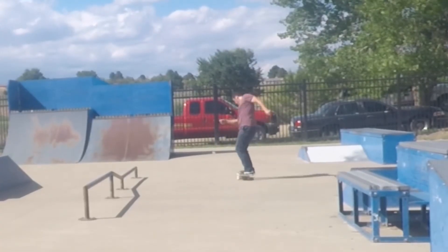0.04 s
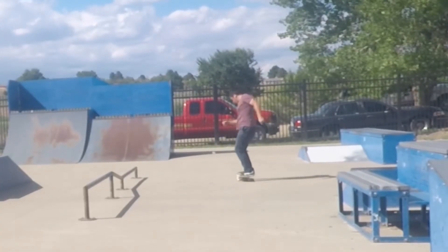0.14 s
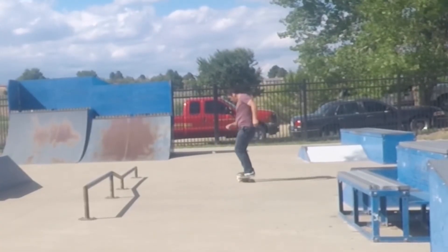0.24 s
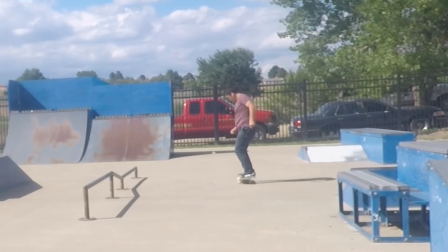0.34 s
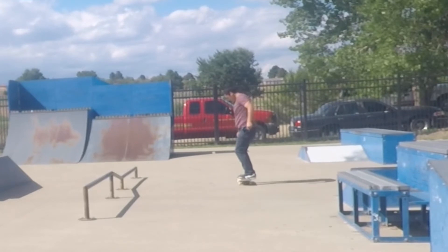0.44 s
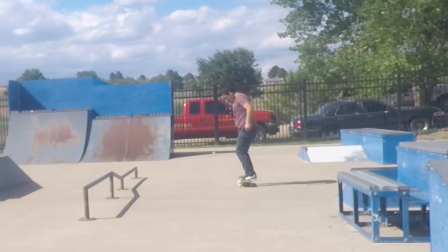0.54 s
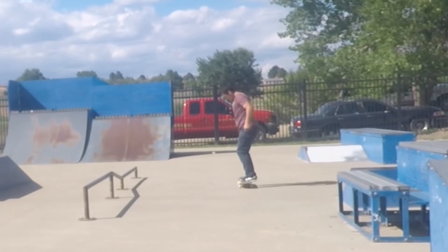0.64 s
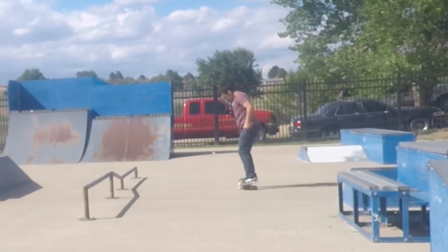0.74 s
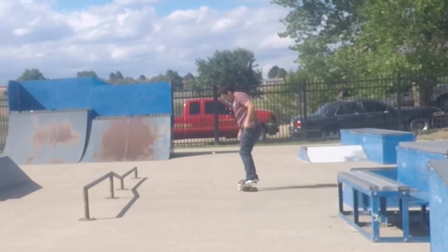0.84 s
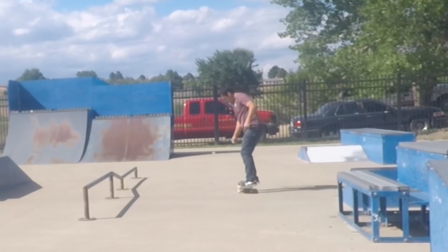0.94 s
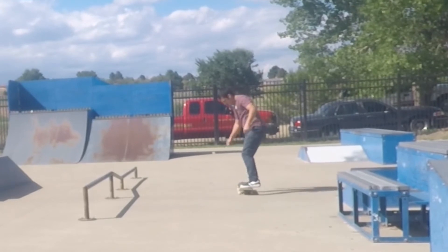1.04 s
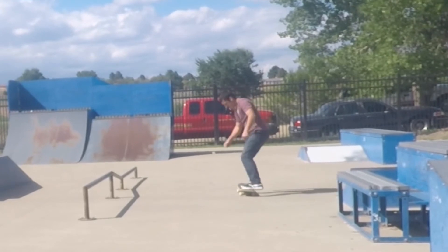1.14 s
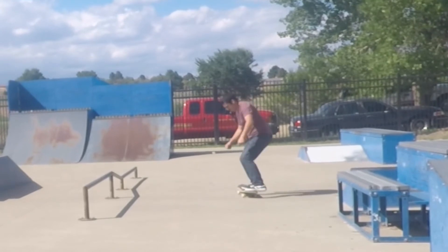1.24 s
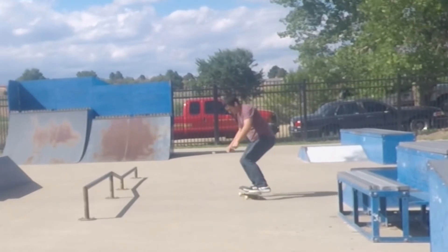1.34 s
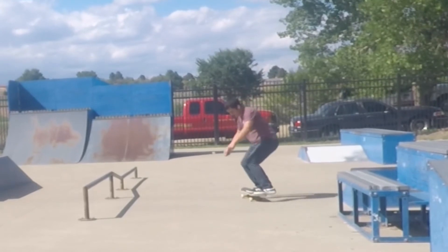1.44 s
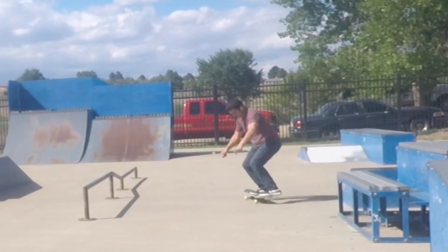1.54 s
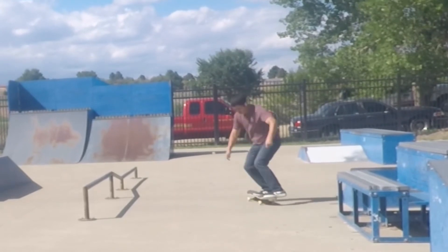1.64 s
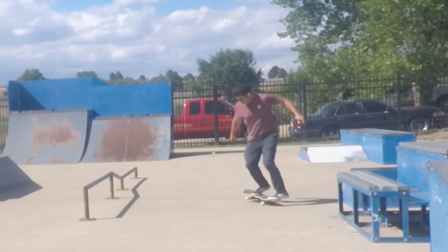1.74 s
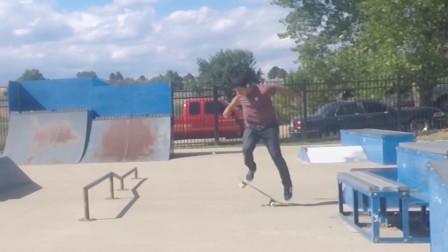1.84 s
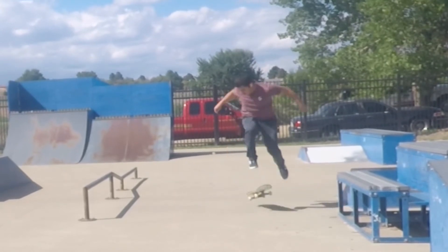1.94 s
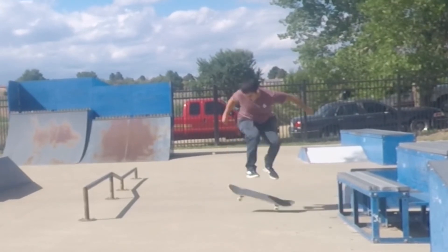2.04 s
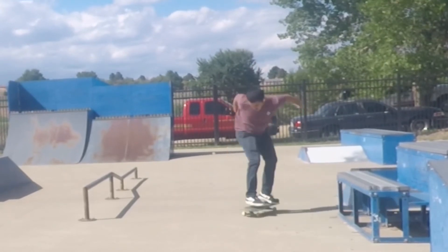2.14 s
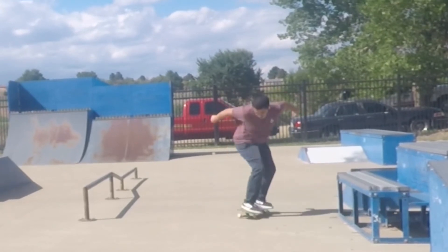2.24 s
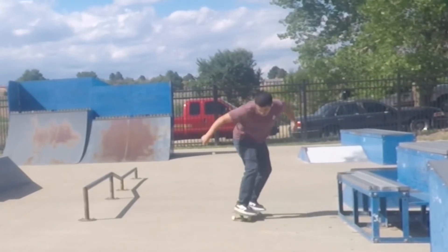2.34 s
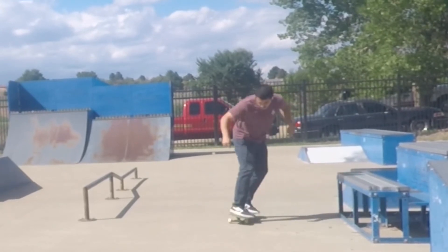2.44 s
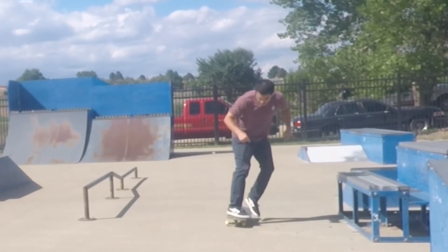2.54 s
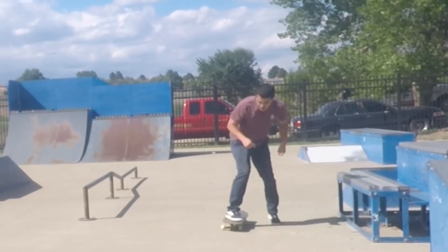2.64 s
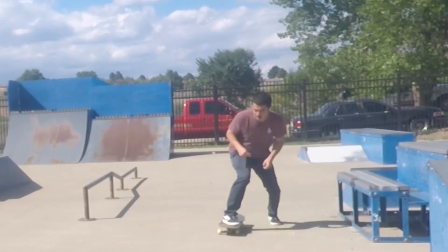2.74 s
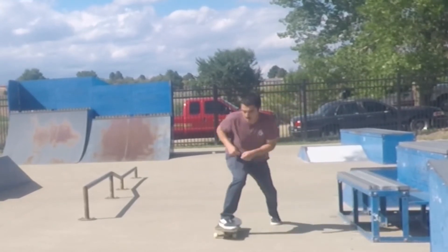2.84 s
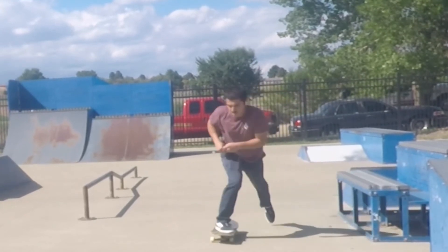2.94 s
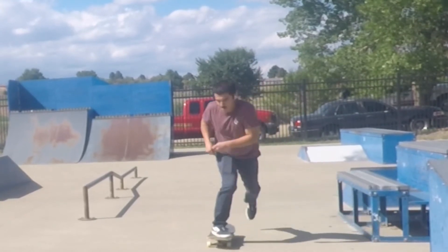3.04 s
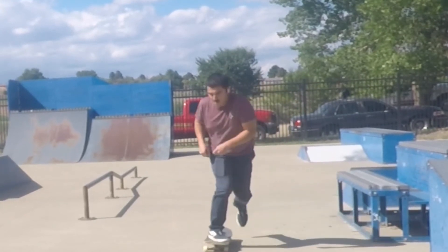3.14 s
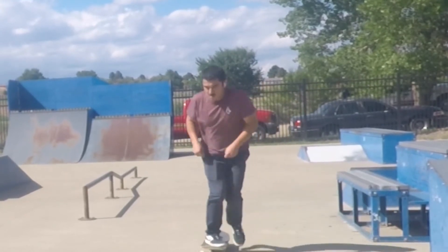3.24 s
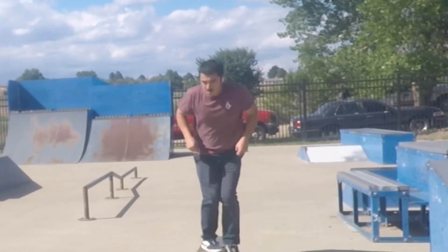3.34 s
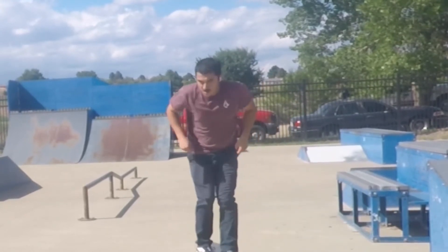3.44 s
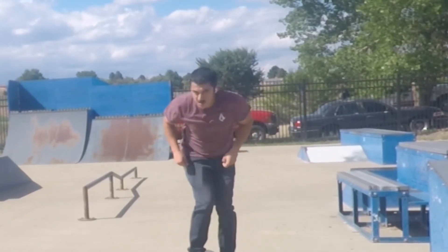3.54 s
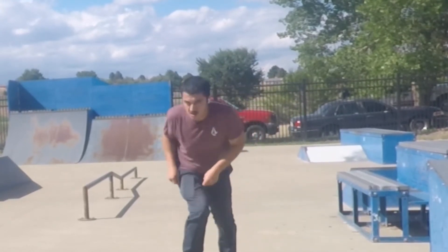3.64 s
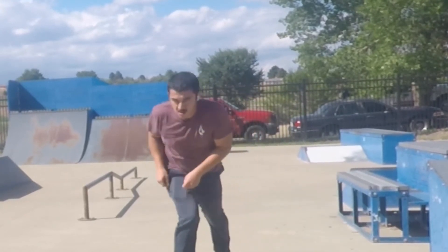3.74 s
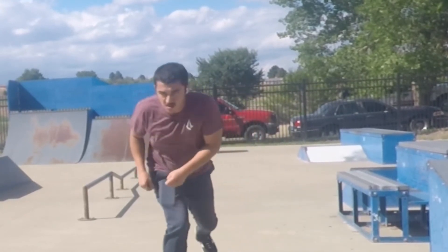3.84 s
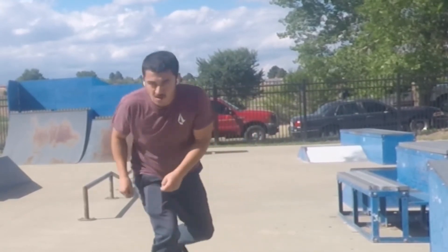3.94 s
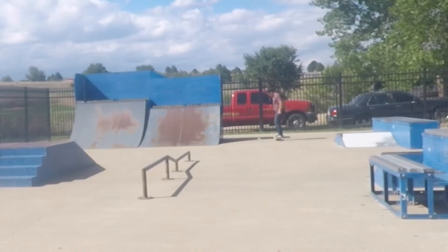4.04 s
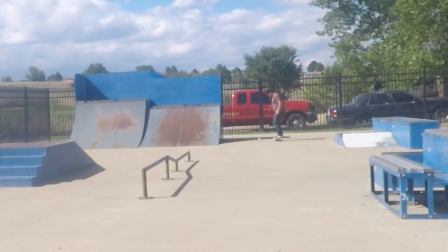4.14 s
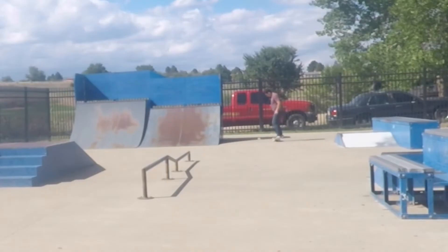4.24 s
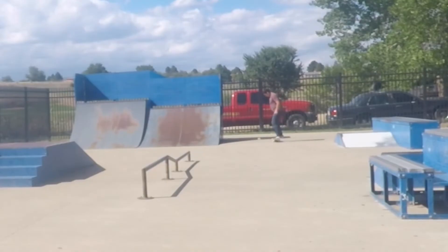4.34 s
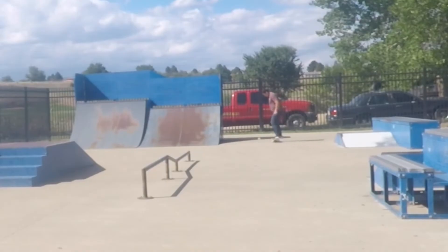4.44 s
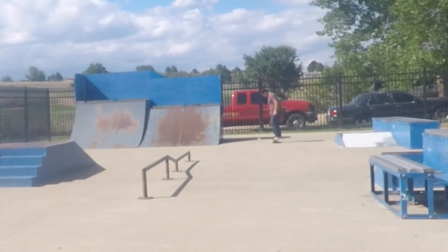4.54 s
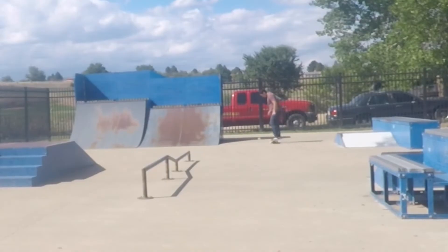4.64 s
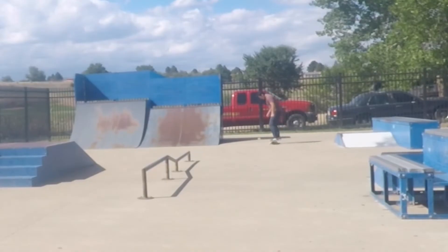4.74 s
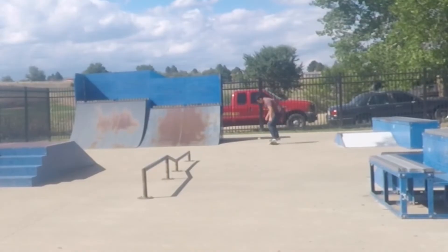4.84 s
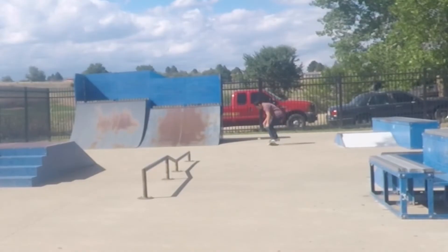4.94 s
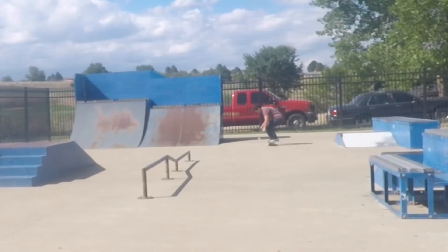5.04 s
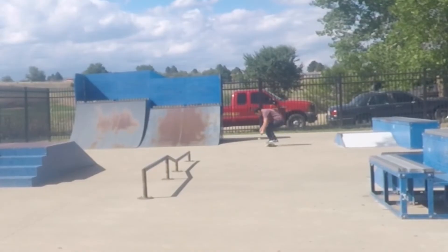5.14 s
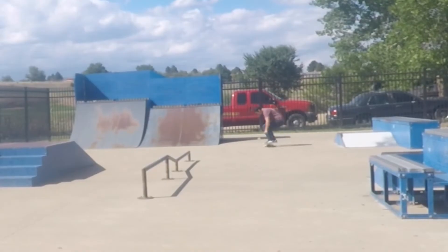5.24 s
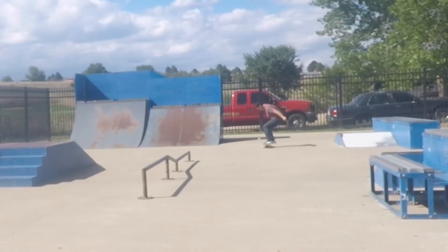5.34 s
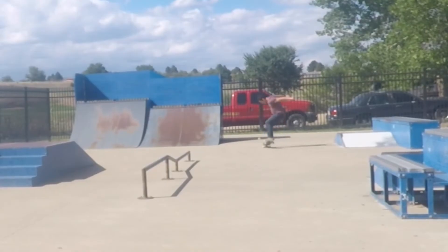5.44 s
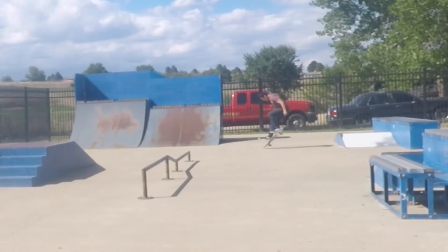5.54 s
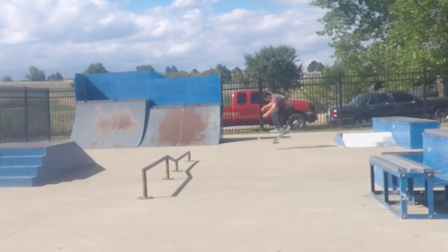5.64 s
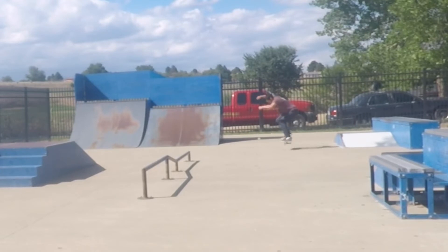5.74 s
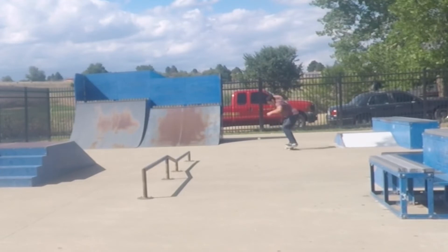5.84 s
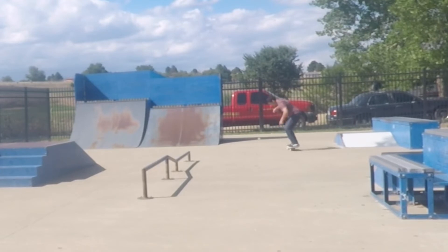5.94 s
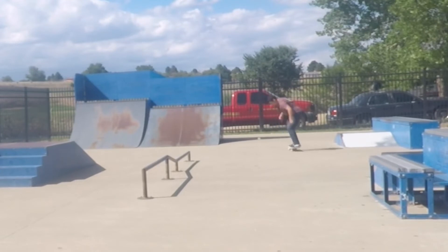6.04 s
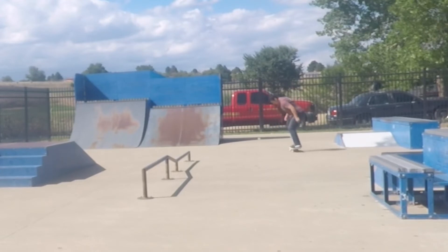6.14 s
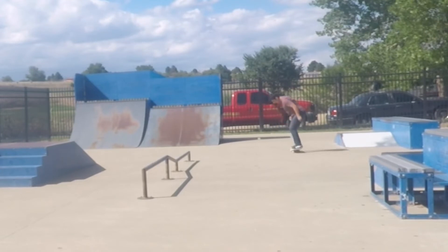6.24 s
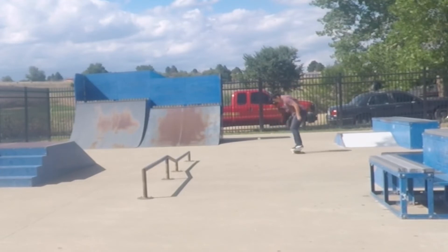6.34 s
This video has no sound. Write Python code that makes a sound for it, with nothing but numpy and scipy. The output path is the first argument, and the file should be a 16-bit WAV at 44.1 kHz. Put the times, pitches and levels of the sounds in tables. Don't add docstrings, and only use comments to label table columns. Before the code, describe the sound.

Hard skateboard wheels rumble and hum across concrete in gusty wind, the board cracks loudly, rolls up close, then after a cut cracks again farther off.

```python
import sys
import numpy as np
from scipy import signal
from scipy.fft import rfft, irfft, next_fast_len
from scipy.io import wavfile
from scipy.ndimage import uniform_filter1d, minimum_filter1d, map_coordinates

SR = 44100
rng = np.random.default_rng(int(sys.argv[2]) if len(sys.argv) > 2 else 0)


def to_linear_factor(level_db):
    exponent = np.asarray(level_db, float) / 20
    return 10 ** exponent


def file_out(sig):
    cols = np.atleast_2d(sig).T
    lim = np.clip(cols, -1, 1)
    pcm = np.round(lim * 32767).astype(np.int16)
    wavfile.write(sys.argv[1], SR, pcm)


N = 282240
CUT_S = 4.02
REACH = SR // 4

# time in seconds, closeness in dB, looseness of the axles in dB.
ROLL = [(0, -27, -30.5), (.1, -46.5, -3.5), (.4, -51.5, -1), (1.1, -41.5, -9), (2.0, -42.5, -16.5),
        (2.12, -25.5, -32), (2.2, -37.5, -3), (2.4, -35.5, -17.5), (3.26, -33, -11.5), (3.46, -27.5, -7.5),
        (3.99, -27, -9), (4.04, -38.5, -18.5), (5.2, -38, -19), (5.4, -35.5, -16), (5.65, -43, -13.5),
        (5.9, -33.5, -5.5), (5.96, -37.5, -19), (6.4, -40, -10)]
# frequency in Hz, width in Hz, level in dB.
DECK = [(444, 64, 3), (566, 60.4, 4.5), (706, 73, -3.5), (955, 22, 2.5), (1187, 20, -16), (1303, 51, -11),
        (1566, 56, -14), (1870, 72, -16), (2458, 37, -22.5)]


def unit(x):
    return x / np.sqrt(np.mean(x ** 2) + 1e-20)


def along(points, hz):
    f, v = np.transpose(points)
    return np.interp(np.log(hz + 1), np.log(f + 1), v)


def curves(table):
    s, *cols = np.transpose(table)
    return [np.interp(np.arange(N) / SR, s, c) for c in cols]


def wobble(rate, size=N):
    knots = rng.standard_normal(int(size * rate / SR) + 4)
    return map_coordinates(knots, [np.arange(size) * rate / SR])


def filtered(x, response):
    m = next_fast_len(x.shape[-1] + SR // 4)
    return irfft(rfft(x, m) * response(np.fft.rfftfreq(m, 1 / SR)), m)[..., :x.shape[-1]]


def modes(f, rows):
    total = 0
    for k, (c, w, db) in enumerate(rows):
        total = total + (-1) ** k * to_linear_factor(db) * 1j * f * w / (c * c - f * f + 1j * f * w)
    return total


def rush(spectrum, grain_db, deck_db=-99, deck=DECK):
    grain = np.array([wobble(180), wobble(180)])
    grains = rng.standard_normal((2, N)) * to_linear_factor(grain_db * grain)
    return unit(filtered(grains, lambda hz: to_linear_factor(along(spectrum, hz)) + to_linear_factor(deck_db) * modes(hz, deck)))


def deck_noise(spectrum, grain_db, near_db, far_db):
    # frequency in Hz, width in Hz, level in dB.
    far_deck = [(480, 50, 5), (724, 29, 8.5), (944, 40, -2.5), (1200, 40, -7.5), (1583, 76, -15.5),
                (1880, 110, -38)]
    close = rush(spectrum, grain_db, near_db)
    far = rush(spectrum, grain_db, far_db, far_deck)
    return np.where(np.arange(N) < CUT_S * SR, close, far)


def swell(length):
    return np.exp(-(np.arange(-REACH, REACH) / SR / (0.4 * length)) ** 2)


def placed(events):
    out = np.zeros((2, N + 2 * REACH))
    for s, sound in events:
        start = round(s * SR)
        out[:, start:start + 2 * REACH] += sound
    return out[:, REACH:N + REACH]


def wind():
    # time in seconds, buffet level in dB.
    buffets = [(0, -11.5), (.7, -19.5), (1.1, -15), (1.84, -21), (2.0, -31), (2.04, -15.5), (2.48, -24),
               (2.58, -34), (3.4, -28.5), (3.75, -34), (3.97, -19.5), (4.04, -45.5), (4.5, -47), (4.9, -38),
               (5.5, -34), (6.4, -33.5)]
    # centre in seconds, length in seconds, change in dB.
    blasts = [(0.088, 0.29, -0.5), (0.289, 0.08, -6), (0.384, 0.051, 0), (1.119, 0.033, 7),
              (1.383, 0.039, 8), (1.54, 0.12, 4), (1.716, 0.07, 4.5), (2.184, 0.17, -5.5), (3.17, 0.15, -6),
              (4.992, 0.041, 11.5), (5.117, 0.071, 10.5), (5.291, 0.095, 13), (5.374, 0.088, 10),
              (5.76, .12, 0)]
    # frequency in Hz, level in dB per Hz.
    gusts = [(6, -34), (15, 1.5), (25, -6), (45, 0.5), (80, -7.5), (140, -13), (250, -26.5), (500, -41),
             (900, -83.5)]
    t = np.arange(N) / SR
    buffet_db = curves(buffets)[0]
    for s, length, db in blasts:
        buffet_db = buffet_db + db * np.exp(-((t - s) / (.5 * length)) ** 2)
    lumps_db = 2.35 * wobble(9.8) + 1.1 * wobble(14)
    return to_linear_factor(buffet_db + 4) * unit(rush(gusts, grain_db=-2) * to_linear_factor(lumps_db))


def puffs():
    # centre in seconds, length in seconds, top frequency in Hz, left and right levels in dB.
    strikes = [(0.137, 0.027, 400, -16, -9.5), (0.182, 0.011, 260, -27, -19), (1.003, 0.017, 600, -42, -43),
               (1.218, 0.095, 247, -20.5, -15.5), (1.389, 0.049, 397, -28.5, -21.5),
               (1.508, 0.039, 304, -33, -20.5), (1.573, 0.021, 870, -21.5, -26.5),
               (1.589, 0.035, 640, -22.5, -34), (1.616, 0.02, 500, -27, -37), (1.711, 0.065, 302, -40, -39),
               (4.385, 0.03, 526, -45, -34)]

    def eddy(top_hz):
        noise = rng.standard_normal((2, 2 * REACH))
        return unit(filtered(noise, lambda f: f / (f + 90) / (1 + (f / top_hz) ** 6.8)))

    return placed((s, to_linear_factor([[left_db], [right_db]]) * swell(length) * eddy(top_hz))
                  for s, length, top_hz, left_db, right_db in strikes)


def ramps(x):
    # frequency in Hz, 60 dB decay time in seconds.
    decay = [(200, 0.68), (1500, 1), (8000, 0.25)]
    hz, t, z = signal.stft(rng.standard_normal((2, SR // 2)), SR, nperseg=256)
    fading = to_linear_factor(-60 * t / along(decay, hz)[:, None])
    tail = signal.istft(z * fading, SR, nperseg=256)[1]
    late = np.pad(x, (500, 0))[None]
    return signal.fftconvolve(late, tail / np.linalg.norm(tail[0]), axes=1)[:, :N]


def drone():
    # time in seconds, ground drone level in dB.
    ground = [(0, -32.5), (1.9, -27.5), (2.3, -23), (2.7, -29), (3.98, -20.5), (4.05, -35), (4.7, -51),
              (5.15, -30), (5.75, -29.5), (5.92, -32.5), (6.3, -23)]
    # time in seconds, share of deck sound swung to the left from 0 to 1.
    swing = [(0, 0.39), (2.0, 0.19), (2.2, 1), (3.2, 0.34), (4.0, 0.82), (4.03, 0.11), (5.7, 0.07),
             (5.85, 0.6), (6.4, 0.25)]
    (rumble_db, _), (drone_db,), (near,) = curves(ROLL), curves(ground), curves(swing)
    noise = rng.standard_normal((3, N))
    low = unit(filtered(noise[:2], lambda hz: modes(hz, [(101.4, 34.8, 0)]) ** 2))
    left = (1.03 + 1.0 * near) * (0.75 * low[0] + 0.42 * low[1])
    right = (1 - 0.67 * near) * low[0]
    low = to_linear_factor(drone_db + 1.64 * wobble(13)) * np.array([left, right])
    ring = unit(filtered(noise[2], lambda hz: modes(hz, [(381.4, 18.7, -5.0), (549.5, 31.4, -9.5)])))
    return low + to_linear_factor(rumble_db + 8.5) * near * ring * [[1], [-.3]]


def wheels():
    # frequency in Hz, level in dB.
    rumble_shape = [(90, -37.5), (150, 11), (200, 5.5), (300, -2), (500, -19), (800, -13), (1300, -33.5),
                    (2500, -70.5)]
    rattle_shape = [(350, -46.5), (600, 6), (800, -12), (1200, -2), (1550, -10), (2100, -12), (2800, -41.5),
                    (4500, -54)]
    grit_shape = [(1200, -30.5), (2200, 3.5), (3000, -2.5), (4500, -0.5), (7000, -4), (9000, -19),
                  (11000, -29.5), (13500, -49), (16000, -90)]
    close_db, loose_db = curves(ROLL)
    grit_db = -20 + 0.8 * close_db + 0.41 * loose_db
    shake = wobble(7.7)
    rumble = deck_noise(rumble_shape, grain_db=1.0, near_db=-10.5, far_db=-10.0)
    rumble = rumble * to_linear_factor(close_db + 6.0 + 0.33 * shake + 1.1 * wobble(30))
    rattle = deck_noise(rattle_shape, grain_db=1.5, near_db=5.0, far_db=1.5)
    rattle = rattle * to_linear_factor(close_db + loose_db + 8.5 + 0.32 * shake + 2.54 * wobble(45))
    grit = to_linear_factor(grit_db + 0.29 * shake + 0.89 * wobble(21.79)) * rush(grit_shape, grain_db=0.5)
    return rumble + rattle + grit


def hum():
    # time in seconds, frequency in Hz.
    spin = [(0, 185), (.8, 183), (1.2, 182), (1.9, 180), (2.15, 176.5), (3, 176.5), (3.6, 174.5), (4, 172)]
    # start in seconds, hold in seconds, level in dB.
    holds = [(0.119, 0.31, -29), (0.325, 0.15, -21.5), (0.721, 0.23, -21), (1.002, 0.11, -20),
             (1.489, 0.022, -27.5), (1.753, 0.019, -25), (2.202, 0.49, -23), (2.612, 0.31, -22),
             (3.158, 0.049, -28), (3.356, 0.076, -18), (3.606, 0.19, -12.5), (3.78, 0.15, -19),
             (3.942, 0.061, -21.5)]
    (hz,), t = curves(spin), np.arange(N) / SR
    rise_db_per_s, fall_db_per_s, idle_db = 302, 99, -48.5
    spells = []
    for s, hold, db in holds:
        rise_db = rise_db_per_s * np.maximum(s - t, 0)
        spells.append(db - rise_db - fall_db_per_s * np.maximum(t - s - hold, 0))
    level_db = np.where(t < CUT_S, np.maximum(np.max(spells, axis=0), idle_db), -99)
    phase = 2 * np.pi * np.cumsum(hz + .8 * wobble(25)) / SR
    octave_db = -41.5 + 0.18 * level_db + 5.5 + 5.7 * wobble(8.6)
    tremble_db = .9 * wobble(25)
    tone = to_linear_factor(level_db + 4.5 + tremble_db) * np.sin(phase) + to_linear_factor(octave_db) * np.sin(2 * phase)
    return tone * [[1], [.4]]


def scuffs():
    # centre in seconds, frequency in Hz, width in Hz, length in seconds, level in dB.
    slides = [(0.69, 1830, 100, 0.025, -57), (0.722, 1130, 110, 0.035, -44), (0.74, 1860, 150, 0.06, -54),
              (0.74, 1400, 120, 0.05, -54), (0.745, 2400, 250, 0.04, -59), (1.76, 1880, 200, 0.05, -56),
              (1.952, 1210, 616, 0.011, -46), (2.084, 1750, 1480, 0.042, -39),
              (2.099, 11800, 2500, .006, -47), (2.14, 6330, 1500, 0.012, -40),
              (2.155, 6000, 1800, 0.025, -43), (2.225, 2800, 1500, 0.02, -46),
              (2.596, 5300, 500, .018, -51), (2.592, 6450, 400, .015, -50), (2.592, 2450, 200, .03, -50),
              (2.537, 1850, 200, .015, -45), (2.583, 1850, 200, .025, -48), (2.058, 5500, 700, .006, -46),
              (2.08, 4500, 3500, .025, -44), (2.594, 3000, 1300, .02, -45), (2.601, 3240, 457, 0.017, -35),
              (3.42, 1500, 1200, 0.05, -40), (3.5, 1500, 1400, 0.06, -38), (3.975, 1200, 1500, 0.032, -33),
              (3.98, 4500, 4000, .04, -45), (5.375, 1700, 600, 0.04, -53), (5.46, 950, 700, 0.12, -43),
              (5.467, 493, 520, 0.071, -36), (5.48, 1900, 500, 0.05, -49), (5.475, 2250, 900, 0.07, -49),
              (5.43, 1900, 700, 0.1, -53), (5.44, 1150, 300, 0.06, -45), (5.53, 2500, 700, 0.05, -56),
              (5.721, 3750, 3000, 0.017, -47), (5.811, 6100, 900, 0.012, -45),
              (5.853, 930, 900, 0.035, -31), (5.857, 1520, 330, 0.026, -26),
              (5.96, 1480, 1510, 0.069, -46.5)]
    singing = [(.15, 1840, 150, 0.22, -67), (.5, 1873, 130, 0.25, -64.5), (.95, 1844, 150, 0.38, -64.5),
               (1.308, 1870, 200, 0.32, -66), (.2, 1166, 150, .3, -56), (.5, 1136, 130, 0.38, -50.5),
               (.85, 1120, 200, 0.37, -49), (1.2, 1180, 200, 0.35, -58), (0.857, 906, 200, 0.22, -47.5),
               (1.37, 1100, 700, 0.094, -44.5), (3.616, 1720, 600, 0.23, -50.5), (3.8, 1740, 600, .2, -48),
               (3.941, 1880, 500, 0.046, -38)]

    def rub(hz, width):
        noise = rng.standard_normal(2 * REACH)
        return unit(filtered(noise, lambda f: modes(f, [(hz, width, 0)]) ** 3))

    return placed((s, to_linear_factor(db) * swell(length) * rub(hz, width))
                  for s, hz, width, length, db in slides + singing)[0]


def squeaks():
    # centre in seconds, frequency in Hz, length in seconds, level in dB.
    bearings = [
        (0.744, 8400, 0.028, -57),
        (3.074, 8550, 0.045, -50),
        (3.502, 8400, 0.06, -50.5),
        (3.622, 8400, 0.062, -46.5),
        (3.87, 8430, 0.09, -44.5),
    ]
    span = 2 * REACH

    def whistle(hz, length, db):
        bent_hz = hz + 260 * swell(.5 * length) + 150 * wobble(1200, span)
        rough_db = 1.5 + 3.0 * wobble(160, span)
        return to_linear_factor(db + rough_db) * swell(length) * np.sin(2 * np.pi * np.cumsum(bent_hz) / SR)

    return placed((s, whistle(hz, length, db)) for s, hz, length, db in bearings)[0]


def rings():
    # start in seconds, frequency in Hz, level in dB, 60 dB decay time in seconds.
    metal = [(2.13, 960, -39, 1.0), (2.1, 1275, -41, .5), (2.6, 3300, -54, .3), (2.64, 3300, -58, .3),
             (5.771, 945, -15, .09), (5.785, 950, -30, .6), (5.78, 1575, -29, .1), (5.87, 1575, -35, .6),
             (5.9, 960, -36, 2.0), (2.098, 969, -20, .07), (2.097, 1857, -27, .06), (2.1, 700, -24, .05),
             (2.27, 385, -24, .9), (2.27, 560, -29, 1.6), (2.28, 320, -27, .3), (2.33, 960, -43, 1.2),
             (2.15, 500, -29, .5), (2.19, 700, -36, .8), (2.67, 385, -28, .5), (2.675, 3280, -59, .3),
             (2.705, 3220, -54, .3), (2.745, 3280, -59, .3), (1.825, 362, -29, 1.0), (.37, 368, -35, 4.0),
             (.65, 366, -32, .6), (.84, 364, -32, 1.0), (1.02, 364, -32, .25), (5.719, 700, -22, .07),
             (5.093, 720, -28, .07), (5.093, 1150, -37, .06), (5.095, 490, -25, .07),
             (5.093, 1000, -36, .05), (5.13, 720, -45, .9), (3.822, 1400, -33, .06),
             (3.978, 2450, -41, .06), (3.98, 1150, -30, .06)]
    out, t = np.zeros(N + SR), np.arange(SR // 2) / SR
    for s, hz, db, t60 in metal:
        loose = np.cumsum((6 + .006 * hz) * wobble(70, len(t))) / SR
        flutter_db = 3.5 * wobble(35, len(t))
        tone = np.sin(2 * np.pi * (hz * t + loose)) * np.cos(np.pi * t)
        out[round(s * SR):][:len(t)] += to_linear_factor(db - 60 * t / t60 + flutter_db) * tone
    return out[:N]


def hits():
    # start in seconds, crack, slap and thud levels in dB,
    # 60 dB decay time in seconds.
    blows = [(1.9632, -13, -13, 1, 0.038), (2.0695, -34.5, -23, -22, 0.074), (2.0958, -5, -14, -2.5, 0.029),
             (2.1045, -11, -8, -4.5, 0.044), (2.1185, -20.5, -19, 2, 0.024),
             (2.5787, -37, -43.5, -41.5, 0.14), (5.7175, -36, -29.5, -25, 0.04),
             (5.7250, -38, -32, -40.5, 0.062), (5.7592, -14.5, -17.5, -28, 0.008),
             (5.7645, -15, -21, -28.5, 0.015), (5.7678, -16, -28.5, -22.5, 0.012),
             (5.7790, -9, -13.5, -29.5, 0.028), (5.7705, -25, -10, -5.5, 0.077),
             (5.7854, -17, -13.5, 2, 0.032), (5.837, -36.5, -35.5, -27.5, 0.043),
             (5.8485, -39, -18, -22, 0.035), (5.8545, -35, -24, -21.5, 0.022),
             (5.860, -30, -32, -29, 0.012)]
    # start in seconds, crack and slap levels in dB.
    taps = [(0.9918, -47.5, -37.5), (1.2115, -55, -42.5), (1.996, -31.5, -34.5), (2.0564, -34, -26),
            (2.1387, -40, -38), (2.157, -46, -42.5), (2.2194, -38.5, -26), (2.2397, -37.5, -28.5),
            (2.4588, -41, -30.5), (2.509, -38, -39.5), (2.5331, -34.5, -26.5), (2.6395, -47, -32),
            (3.399, -45, -37), (3.413, -32, -28), (3.461, -30.5, -38), (3.482, -41, -28),
            (3.51, -37, -27.5), (3.546, -39, -28.5), (3.714, -46, -43.5), (3.829, -43, -41.5),
            (3.899, -53.5, -35), (3.9841, -50, -26.5), (5.045, -54, -51), (5.078, -54.5, -41),
            (5.0915, -41, -29.5), (5.353, -56, -43.5), (5.8065, -37.5, -38.5), (5.887, -35.5, -40),
            (5.9150, -37, -38), (5.945, -40.5, -36)]
    # time in seconds, thud in Hz, overtone in Hz, overtone's share.
    stiffness = [
        (1.96, 247, 434, 0.57),
        (2.1, 253, 480, 0.63),
        (5.77, 226, 775, 0.32),
        (5.785, 279, 786, 0.71),
        (5.85, 283, 600, 0.52),
    ]
    # frequency in Hz, level in dB.
    crack_shape = [(1200, -1), (2000, 3.5), (3200, -4), (5000, -5), (8000, -10), (10200, -17),
                   (11500, -53.5), (13500, -85)]
    slap_shape = [(250, 1), (450, 0), (900, 7), (1500, -12), (2200, -14.5), (3500, -88.5)]
    tap_thud_db, tap_t60_s = -31.5, 0.032
    t = np.arange(SR // 8) / SR
    crack, slap, thud = np.zeros((3, N + SR))
    contacts = sorted(blows + [(*tap, tap_thud_db, tap_t60_s) for tap in taps])
    times, *columns = np.transpose(stiffness)
    for s, crack_db, slap_db, thud_db, t60 in contacts:
        hz, over_hz, share = [np.interp(s, times, c) for c in columns]
        at = slice(round(s * SR), round(s * SR) + len(t))
        noise = rng.standard_normal((2, len(t))) * to_linear_factor(3.5 * wobble(687, len(t)))
        crack_env = to_linear_factor(crack_db - 5.5 - 60 * (t / t60) ** 1.64) * (1 - np.exp(-t / 0.00031))
        slap_env = to_linear_factor(slap_db - 1.0 - 60 * (t / (1.03 * t60)) ** 1.306) * (1 - np.exp(-t / 0.003))
        thud_env = to_linear_factor(thud_db + 3.5 - 60 * (t / (0.92 * t60)) ** 1.6) * (1 - np.exp(-t / 0.0033))
        crack[at] += crack_env * noise[0]
        slap[at] += slap_env * noise[1]
        thud[at] += thud_env * (np.sin(2 * np.pi * hz * t) + share * np.sin(2 * np.pi * over_hz * t))
    bright = filtered(crack[:N], lambda hz: to_linear_factor(along(crack_shape, hz) + 5.0))
    dulled = filtered(bright, lambda hz: 1 / (1 + (hz / 8500) ** 5.9))
    bright = np.where(np.arange(N) < CUT_S * SR, bright, dulled)
    wood = filtered(slap[:N], lambda hz: to_linear_factor(along(slap_shape, hz) + 18.0) + to_linear_factor(26.5) * modes(hz, DECK))
    return bright + wood + thud[:N]


def ports(pair):
    # frequency in Hz, width in Hz, level in dB.
    cavity = (5700, 960, 11.3)
    # frequency in Hz, level in dB.
    left_db = [(20, 6), (120, -6.5), (300, -6.5), (470, -22), (600, -3.5), (730, -8.5), (1000, -4.5),
               (1120, -1.5), (1380, -4), (1600, 0), (1770, 6), (1900, 10), (2030, -15.5), (2500, -3.5),
               (3700, 2.5), (5200, -12.5), (7300, -1.5), (11000, -15)]
    # frequency in Hz, lead of the left port in radians.
    left_lead = [(20, -0.3), (330, 0), (470, 2.8), (730, 2.8), (990, 2.6), (1120, 2), (1380, 1.8),
                 (1510, 2.6), (1640, 2.9), (1890, 4.3), (2150, 2.7), (2280, .6), (2540, -.1), (2700, 1.5),
                 (4800, 1.05), (7000, -5), (9500, 6.5)]
    # frequency in Hz, share common to both ports from 0 to 1.
    alike = [(20, .994), (50, .99), (100, .92), (300, .7), (730, .92), (1100, .8), (1300, .6), (1640, .85),
             (1770, .6), (1900, .8), (2200, .4), (3000, .6), (6000, .8), (9000, .5), (12000, .4)]
    fade_in_s = .004
    pair = pair * np.sin(np.minimum(np.arange(N) / (fade_in_s * SR), 1) * np.pi / 2) ** 2

    def left(hz):
        share = np.clip(along(alike, hz), 0, 1)
        tilt = to_linear_factor(along(left_db, hz)) * np.exp(1j * along(left_lead, hz))
        return tilt * [share, np.sqrt(1 - share ** 2)]

    right = filtered(pair[0], lambda hz: 1 + modes(hz, [cavity]))
    return np.array([filtered(pair, left).sum(axis=0), right])


def scene():
    board = hits() + squeaks() + rings() + scuffs()
    echoes = to_linear_factor(-20.0) * ramps(board)
    air = board * [[1], [.6]] + echoes + wheels() + hum() + wind()
    return ports(air) + drone() + puffs()


def band_limit(x):
    return signal.sosfilt(signal.butter(12, 15000, fs=SR, output="sos"), x)


def record(dry):
    # time in seconds, hiss level in dB.
    gain = [(0, -60.5), (4.0, -54), (4.03, -56), (5.6, -55), (5.8, -53), (6.05, -58), (6.4, -55.5)]
    # frequency in Hz, hiss level in dB.
    hiss_shape = [(2000, 2), (4000, -5.5), (6000, -0.5), (9000, -2), (11000, -10.5), (13000, -17.5),
                  (15000, -28)]
    fade, = curves([(0, 0.77), (3.995, 1), (4.019, 0.031), (4.05, 1), (6.4, 1)])
    hiss = to_linear_factor(curves(gain)[0]) * rush(hiss_shape, grain_db=1.0)
    x = (dry + hiss) * fade
    room = np.minimum(1, .95 / (np.abs(x).max(axis=0) + 1e-9))
    x = x * uniform_filter1d(minimum_filter1d(room, size=801), size=400)
    return band_limit(x)


dry = scene()
out = record(dry)
file_out(out)
```